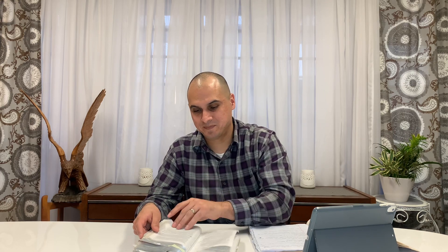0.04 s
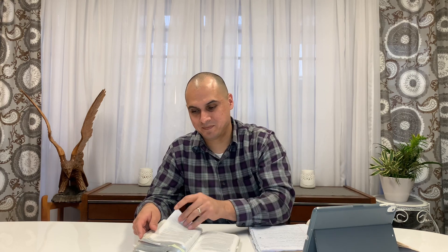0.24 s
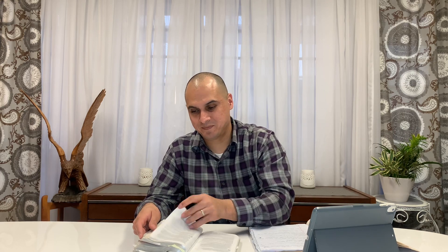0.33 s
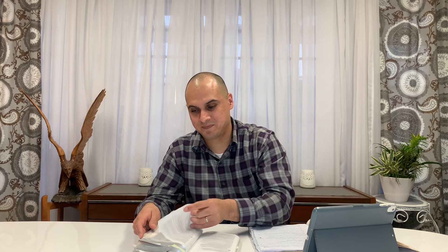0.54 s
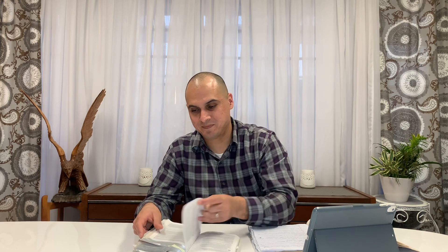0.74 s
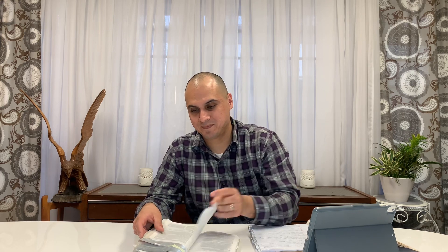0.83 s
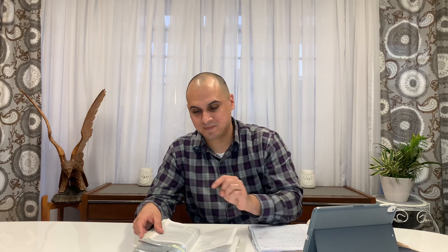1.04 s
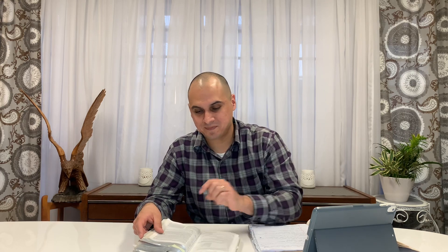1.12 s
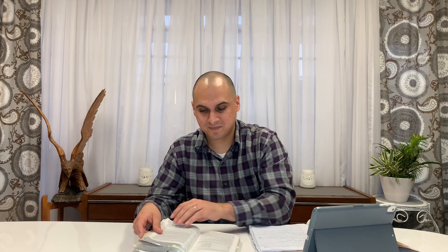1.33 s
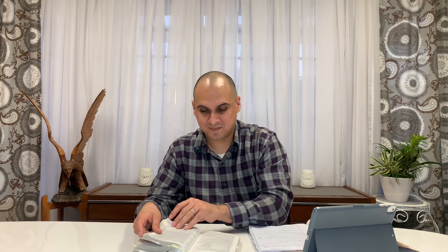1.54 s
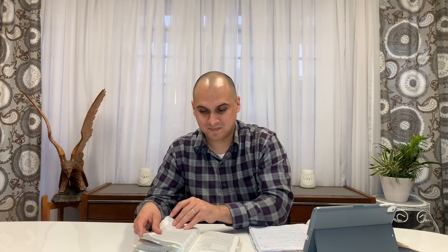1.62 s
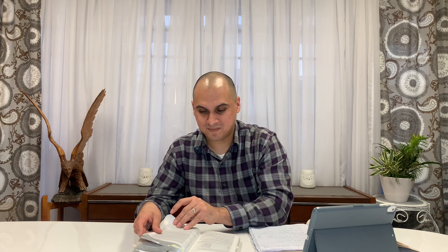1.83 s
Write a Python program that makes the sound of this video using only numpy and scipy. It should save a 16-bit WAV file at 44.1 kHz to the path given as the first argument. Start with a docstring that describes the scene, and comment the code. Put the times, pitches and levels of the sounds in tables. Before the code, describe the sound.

A thin book page is turned close by, rustling and crackling in two bursts with sharp snaps, then light fingers tick on the next page; small furnished room, stereo microphone, low rumble and faint hiss.

```python
"""A low rumble and thin hiss run throughout, while a thin page is lifted, bent and flipped.
The rumble and hiss are shaped noise. The bent sheet rustles in dense random crackle, its creases snap
as short noise bursts that ring the book, and fingers tick on the next page as brief damped tones.
A diffuse room tail rings on after the paper; two ports hear the page with a small time difference."""
import sys
import numpy as np
from scipy import signal
from scipy.fft import rfft, irfft
from scipy.io import wavfile
from scipy.ndimage import uniform_filter1d

SR = 44100
rng = np.random.default_rng(int(sys.argv[2]) if len(sys.argv) > 2 else 0)


def inscribe(sig):
    """Save sig as 16-bit PCM at rate SR to the path in sys.argv[1].

    A 1-D sig is mono; a 2-D sig holds one channel per row.
    Samples are clipped to [-1, 1] before scaling.
    """
    pcm = np.round(np.clip(np.atleast_2d(sig).T, -1, 1) * 32767)
    wavfile.write(sys.argv[1], SR, pcm.astype(np.int16))


def voltage_ratio(decibels):
    """Convert decibels (scalar or array-like) to amplitude ratios, 20 dB per decade."""
    exponent = np.asarray(decibels, float) / 20
    return 10 ** exponent


N = 83790

# Spectrum of the background noise. Each row: frequency in Hz, relative level in dB.
AIR_SPECTRUM = [(18, -28), (40, -15), (62, 0), (80, -6), (100, -5), (140, -12), (200, -18), (240, -25),
                (400, -33), (1000, -41.5), (2500, -44), (6000, -47.5), (14000, -49), (16000, -53)]
# Likeness of the background at left and right. Each row: frequency in Hz, correlation from 0 to 1.
AIR_CORRELATION = [(30, .93), (120, .87), (400, .6), (1200, .15), (16000, .1)]
# Random wavering of the background rumble's level. Each row: time in seconds, gain in dB, to which
# a faster waver is added.
RUMBLE_GAIN = [(0, 10), (.18, -2.5), (.27, 5.5), (.48, 1), (.56, 3.5), (.92, 6), (.98, -5), (1.06, 5.5),
               (1.17, -6.5), (1.27, 5.5), (1.5, -6), (1.62, 1), (1.81, 3.5), (1.9, -11)]
# Decay of the room. Each row: frequency in Hz, time to fall 60 dB in seconds.
ROOM_DECAY = [(150, 0.15), (1000, 0.38), (4000, 0.4), (9000, 0.25), (16000, 0.12)]
# Fingers ticking on the page. Each row: start in seconds, level in dB, ring frequency in Hz,
# level of the crackling edge in dB relative to the tick.
FINGER_TICKS = [(1.2237, -53, 3160, -5.5), (1.252, -48.5, 4300, -11), (1.267, -44.5, 1790, -10.5),
                (1.2747, -45, 2140, -12), (1.2678, -44, 5660, -5), (1.3324, -46, 1450, -8.5),
                (1.3949, -49, 3820, -13.5), (1.3953, -50.5, 2190, -11.5), (1.405, -62, 2410, -5),
                (1.4755, -60.5, 2270, -10.5), (1.5203, -65, 4050, -3), (1.5608, -59, 1597, -11.5),
                (1.59, -53.5, 3540, -22), (1.5963, -42, 2030, -25.5), (1.7293, -56.5, 2500, -11),
                (1.7972, -57.5, 2700, -10.5), (1.8147, -60, 3250, -10)]
# Modes of the struck book. Each row: frequency in Hz, level in dB, time to fall 60 dB in seconds.
BOOK_MODES = [(375, -23, .07), (830, -27, .035), (1600, -23, .02), (2420, -25, .015), (4960, -28, .012)]
# Creases snapping. Each row: time in seconds, approximate peak in dB, centre frequency in Hz,
# tilt in dB per octave.
CREASE_SNAPS = [(0.0876, -43.5, 9200, -0.5), (0.198, -37.5, 10890, 1), (0.2028, -39, 9500, -1.5),
                (0.205, -28, 10600, 0.5), (0.2133, -33.5, 9500, 0.5), (0.2769, -31, 9200, 1),
                (0.3383, -16.5, 9200, 1.68), (.425, -41, 8600, -2), (0.501, -41, 1390, 0.5),
                (0.5426, -36, 9400, 0.5), (0.586, -45.5, 2390, 0), (0.6969, -29, 2310, 1.5),
                (0.7588, -17.5, 4670, 1.5), (0.7654, -27, 4950, 6), (0.7675, -35.5, 9300, -2),
                (0.786, -31.5, 13000, -1), (0.9864, -47, 3600, 1), (1.7964, -58, 12000, 7.5),
                (1.8684, -61, 9730, -0.5)]
# Colour of a snapping crease, also of a tick's edge. Each row: frequency in Hz, relative level in dB.
CREASE_COLOUR = [(150, -8), (400, -9), (1500, -4.5), (2400, -2), (3100, -5.5), (3900, 3.5), (5000, -1),
                 (6500, 6), (9500, 1.5), (16000, 1.5)]
# The sheet moving. Each row: time in seconds, rustle level in dB before flutter, tilt in dB per octave.
SHEET_MOTION = [(0, -68.5, 3.5), (.03, -71.5, -9), (.09, -58, 3.8), (.125, -90, -16), (.196, -78.5, 3),
                (.2, -46.5, 4.5), (.23, -55, -3), (.274, -56, 6), (.284, -53.5, -0.5), (.305, -50.5, 3),
                (.335, -44, 6.5), (.36, -44.5, -0.5), (.395, -46.5, 7), (.41, -51.5, -4), (.46, -55, -2),
                (.53, -53.5, -1), (.6, -64, -4), (.685, -64, -7), (.698, -53.5, -6), (.748, -69.5, -12.5),
                (.757, -38.5, 3.2), (.79, -42.5, 1.5), (.84, -48, 2.4), (.9, -66.5, -2), (1.0, -91.5, -8),
                (1.2, -102, -9), (1.27, -65.5, -4), (1.3, -77.5, 4), (1.42, -84, -13.5), (1.45, -100, -4),
                (1.58, -87.5, -7.5), (1.61, -92, -15), (1.65, -90.5, -1), (1.68, -76.5, -4), (1.74, -99, 2),
                (1.84, -82.5, -6.5), (1.9, -94.5, 11.5)]
# How much of the sheet's width moves, which sets its dull body. Each row: time in seconds, gain in dB.
SHEET_BODY = [(0, -9.5), (.1, 13), (.2, 10), (.3, 8), (.34, 10), (.45, -3.5), (.6, 9.5), (.72, -14),
              (.76, 4), (.9, 1), (1.05, -5.5), (1.25, -11), (1.9, -4)]
# Colour of paper crackle. Each row: frequency in Hz, relative level in dB.
PAPER_COLOUR = [(120, -13), (250, -1.5), (500, -5), (1000, 1.5), (2000, 4), (4000, 1), (6000, 3),
                (9000, -1), (13000, -3), (16000, -13.5)]
# The page crossing over in the flip. Each row: time in seconds, share of the far side from 0 to 1.
PAGE_CROSSING = [(0, 0), (.62, 0), (.72, 1), (1.0, 1), (1.2, .4), (1.9, .4)]
# Lead of the left port over the right. In order: near side in seconds, far side in seconds.
PORT_LEADS = [.000085, .000055]

CREASE_RISE_S, CREASE_FALL_S = .0005, .00062  # time constants


def curve(table, col):
    """Linear interpolation in time: a table column joined by straight lines."""
    a = np.array(table, float)
    return np.interp(np.arange(N) / SR, a[:, 0], a[:, col])


def on_hz(table, size):
    """Interpolation on a logarithmic frequency axis, at the bins of a real transform."""
    a = np.array(table, float)
    f = np.fft.rfftfreq(size, 1 / SR)
    return np.interp(np.log(f + 1), np.log(a[:, 0]), a[:, 1])


def unit(x):
    """Normalization: scale to rms 1."""
    return x / np.sqrt(np.mean(x ** 2))


def walk(rate):
    """Slow random modulation: Gaussian targets every 1 / rate s, joined by slides, at rms 1."""
    k = int(SR / rate)
    held = np.repeat(rng.standard_normal(N // k + 1), k)
    return unit(uniform_filter1d(held, k)[:N])


def bands(x):
    """Filter bank: overlapping half-octave slices that sum to the whole above 16 Hz."""
    octave = np.log2(np.fft.rfftfreq(len(x), 1 / SR) + 1)
    spectrum = rfft(x)
    for c in np.arange(4, 14.6, .5):
        yield 2 ** c, irfft(spectrum * np.clip(1 - 2 * abs(octave - c), 0, 1), len(x))


def air():
    """Partly correlated noise: a low rumble, strongest near 60 Hz and wavering, over thin hiss."""
    base_db, waver_db = -60, 1.2  # rms before the rumble is modulated; rms waver
    alike = np.clip(on_hz(AIR_CORRELATION, N), 0, 1)
    weights = voltage_ratio(on_hz(AIR_SPECTRUM, N)) * np.sqrt([1 + alike, 1 - alike])
    mid, side = rfft(rng.standard_normal((2, N))) * weights
    noise = unit(irfft(np.array([mid + side, mid - side]), N)) * voltage_ratio(base_db)
    low = signal.sosfilt(signal.butter(2, 300, fs=SR, output="sos"), noise)
    gain = voltage_ratio(curve(RUMBLE_GAIN, 1) + waver_db * walk(14))
    return noise + (gain - 1) * low


def room(x):
    """Diffuse reverberation: independent noise tails at left and right, each band decaying on its own."""
    room_db, onset_s = -5.5, .0033  # tail energy relative to the direct sound
    t, a = np.arange(SR // 2) / SR, np.array(ROOM_DECAY)
    out = []
    for _ in range(2):
        tail = np.zeros(len(t))
        for hz, band in bands(rng.standard_normal(len(t))):
            t60 = np.interp(np.log(hz), np.log(a[:, 0]), a[:, 1])
            tail += band * np.exp(-np.log(1000) * t / t60)
        tail *= 1 - np.exp(-t / onset_s)
        out.append(signal.fftconvolve(x, tail / np.sqrt(np.sum(tail ** 2)))[:N])
    return np.array(out) * voltage_ratio(room_db)


def burst(chance, tone, rise, fall):
    """Impulsive noise: a short burst, spectrally evened, coloured by a dB curve; peak near 1."""
    t = np.arange(1024) / SR
    shape = np.where(t < 3 * rise, np.exp(t / rise - 3), np.exp((3 * rise - t) / fall))
    s = rfft(shape * np.sign(chance))
    b = irfft(s / uniform_filter1d(abs(s), size=15) * voltage_ratio(tone))
    return b / np.sqrt(np.sum(b ** 2) / 30)


def ticks():
    """Damped resonance: each fingertip excites a short ring with a dull crackle at its edge."""
    skirt_db, t60_s = -5.5, .0065  # skirt per octave away from 2.5 kHz
    out, t = np.zeros(N + 1024), np.arange(1024) / SR
    distance = abs(np.log2(np.fft.rfftfreq(1024, 1 / SR) / 2500 + 0.013))  # octaves
    tone = on_hz(CREASE_COLOUR, 1024) + skirt_db * distance
    for s, db, hz, edge_db in FINGER_TICKS:
        onset = 1 - np.exp(-t * hz)
        ring = np.sin(2 * np.pi * hz * t) * onset * np.exp(-np.log(1000) * t / t60_s)
        noise = burst(rng.standard_normal(1024), tone, CREASE_RISE_S / 2, CREASE_FALL_S)
        k = int(s * SR)
        out[k:k + 1024] += voltage_ratio(db) * (ring + voltage_ratio(edge_db) * noise)
    return out[:N]


def book(blows):
    """Modal response: the blows themselves plus the short ring of the stacked pages."""
    t = np.arange(SR // 8) / SR
    ring = np.zeros(len(t))
    for hz, db, t60 in BOOK_MODES:
        ring += voltage_ratio(db) * np.sin(2 * np.pi * hz * t) * np.exp(-np.log(1000) * t / t60)
    return blows + signal.fftconvolve(blows, ring)[:N]


def snaps():
    """Sudden release: each crease gives a millisecond burst, broad with a hump at its centre."""
    hump_db = 8.5
    out, octave = np.zeros(N + 1024), np.log2(np.fft.rfftfreq(1024, 1 / SR) + 30)
    for s, db, hz, tilt in CREASE_SNAPS:
        hump = hump_db * np.exp(-(2 * (octave - np.log2(hz))) ** 2)
        tone = on_hz(CREASE_COLOUR, 1024) + tilt * (octave - 12) + hump  # tilts about 4 kHz
        k = int((s - 2 * CREASE_RISE_S) * SR)
        out[k:k + 1024] += voltage_ratio(db) * burst(rng.standard_normal(1024), tone, CREASE_RISE_S, CREASE_FALL_S)
    return out[:N]


def pops(hz):
    """Random excitation with decay: gain jumps by chance and falls back within cycles of the pitch."""
    pops_per_s, fall_cycles = 50, 8
    jump = voltage_ratio(4.5) / (1 + (hz / 4000) ** 2)  # weaker jumps at high pitch
    jumps = jump * np.minimum(rng.exponential(1, N), 2) * (rng.random(N) < pops_per_s / SR)
    gain = .6 + signal.lfilter([1], [1, -np.exp(-hz / fall_cycles / SR)], jumps)
    return unit(gain)


def rustle():
    """Superposed crackle: dense uneven impulses; separate curves set their loudness and brightness."""
    crackle_per_s, spread_db = 9000, 1.2
    flutter_db, patchy_db = 1.5, 2.6  # rms, for the whole sheet and for each band
    size = voltage_ratio(spread_db * np.minimum(rng.exponential(1, N), 5)) * rng.standard_normal(N)
    impulses = size * (rng.random(N) < crackle_per_s / SR)
    crackle = unit(irfft(rfft(impulses) * voltage_ratio(on_hz(PAPER_COLOUR, N)), N))
    level = curve(SHEET_MOTION, 1) + flutter_db * walk(90)
    tilt, body = curve(SHEET_MOTION, 2), curve(SHEET_BODY, 1)
    out = np.zeros(N)
    for hz, band in bands(crackle):
        tilted = level + tilt * np.log2(np.clip(hz, 1260, 9500) / 4000)
        dull = body / (1 + (hz / 1000) ** 4)  # mainly below 1 kHz
        out += band * voltage_ratio(tilted + dull + patchy_db * walk(30.33)) * pops(hz)
    return out


def scene():
    """Interaural-style delay: paper reaches the left port first by a lead that follows the page."""
    page = rustle() + book(snaps()) + ticks()
    far = curve(PAGE_CROSSING, 1)
    f, ports = np.fft.rfftfreq(N, 1 / SR), np.array([[1], [-1]])
    direct = np.zeros((2, N))
    for share, lead in zip((1 - far, far), PORT_LEADS):
        direct += irfft(rfft(page * share) * np.exp(1j * np.pi * f * lead * ports), N)
    return direct + room(page) + air()


def roll_off(x):
    """The treble ends steeply here."""
    return signal.sosfilt(signal.butter(12, 17010, fs=SR, output="sos"), x)


def record(dry):
    """Frequency-dependent phase: one shared treble turned between the ports, a weaker left below it."""
    join_hz, zero_hz, turn_s = 7000, 9400, .00022  # the ports agree in phase at zero_hz
    f, s = np.fft.rfftfreq(N, 1 / SR), rfft(dry)
    shared = 1 / (1 + (join_hz / (f + 1)) ** 24)
    phase = 2 * np.pi * (zero_hz - f) * turn_s
    rippled = phase - .3 * np.sin(2 * phase)  # a sine ripple added to the phase slope
    turn = np.exp(.5j * rippled * np.array([[1], [-1]]))
    s[0] *= voltage_ratio(-4 * (0.5 - shared))  # 2 dB down well below the join
    out = np.sqrt(1 - shared) * s + np.sqrt(shared) * turn * s[1]
    top_cut = 1 / np.sqrt(1 + (f / 15400) ** 50)
    return roll_off(irfft(out * top_cut, N))


dry = scene()
out = record(dry)
inscribe(out)
```